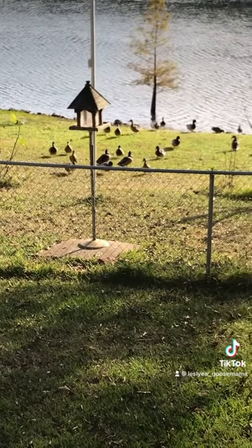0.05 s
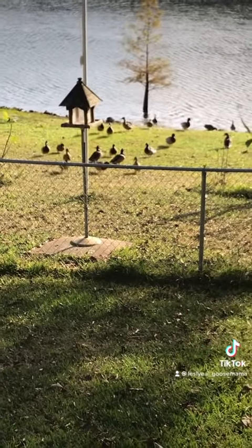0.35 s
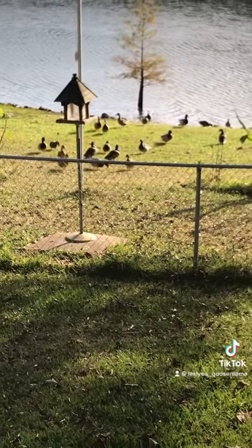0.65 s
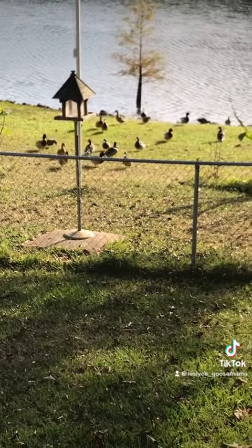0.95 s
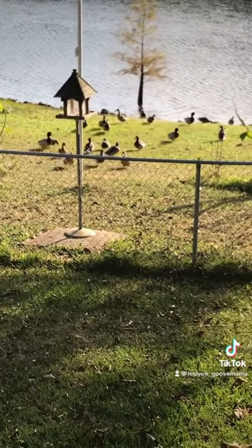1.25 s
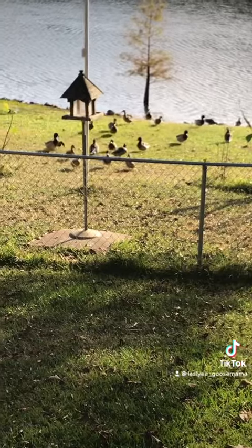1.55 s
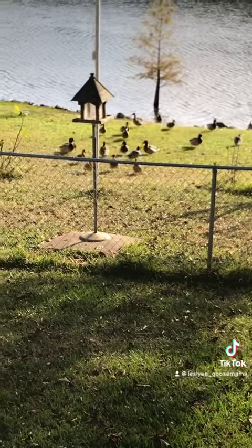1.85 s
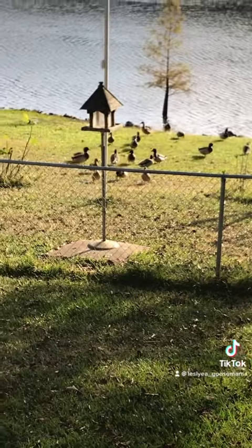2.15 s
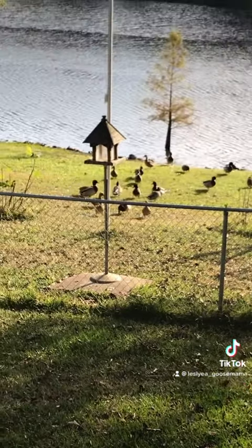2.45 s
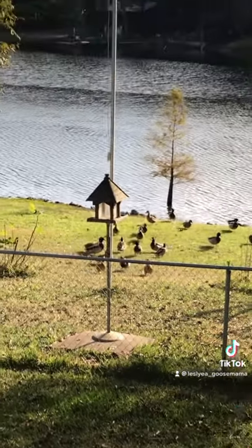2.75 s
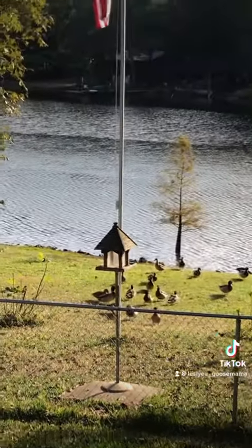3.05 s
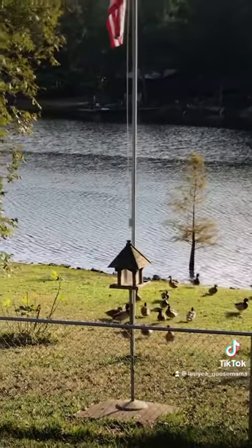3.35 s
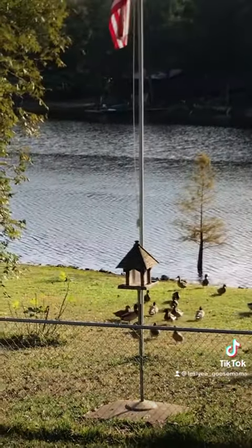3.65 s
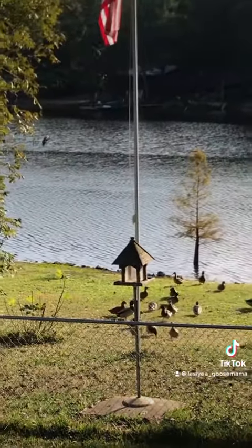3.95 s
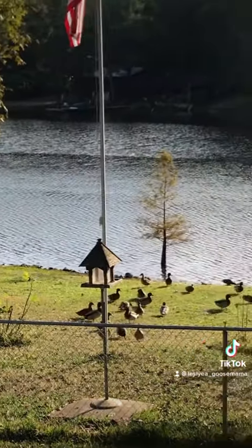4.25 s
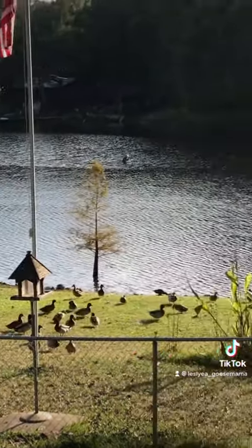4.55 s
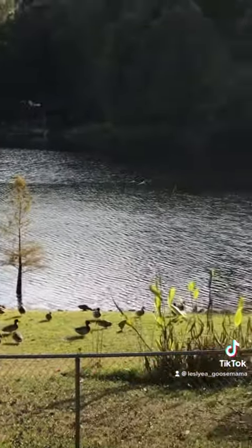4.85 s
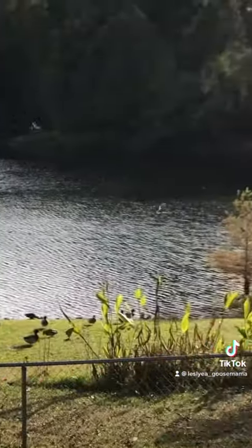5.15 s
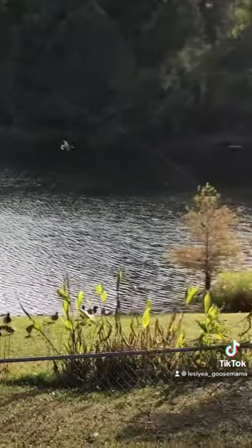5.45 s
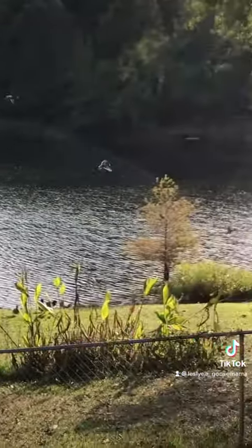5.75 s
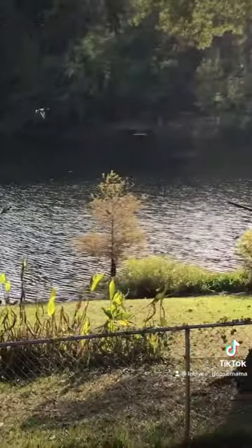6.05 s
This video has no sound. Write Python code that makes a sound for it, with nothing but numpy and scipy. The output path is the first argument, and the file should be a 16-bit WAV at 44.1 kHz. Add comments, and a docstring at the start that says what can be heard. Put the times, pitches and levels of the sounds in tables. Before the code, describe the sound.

A duck gives a run of loud quacks that gradually weaken, while other ducks cluck softly over a low outdoor rumble.

```python
"""A hen mallard on a lakeside lawn, across a yard from the microphone, gives eleven falling quacks.
Her syrinx gives a main and a weaker clap each cycle; her throat rings higher as the bill opens. The flock
clucks around her; far off are four hoots, small birds chipping and dull knocks. The yard throws it all
back over a low outdoor rumble, and a soft rush rises near the end. One dull microphone, in mono, with
a faint hiss, a brush of wind at the start and two late, low bumps."""
import sys
import numpy as np
from scipy import signal
from scipy.fft import rfft, irfft
from scipy.io import wavfile
from scipy.ndimage import uniform_filter1d

SR = 44100
rng = np.random.default_rng(int(sys.argv[2]) if len(sys.argv) > 2 else 0)


def output_pcm(signal):
    """Save a mono or channel-first signal as 16-bit PCM at the path in sys.argv[1].

    Samples are clipped to [-1, 1] before scaling.
    """
    pcm = np.clip(np.atleast_2d(signal).T, -1, 1) * 32767
    wavfile.write(sys.argv[1], SR, np.round(pcm).astype(np.int16))


N = 269451
TIME = np.arange(N) / SR

# outdoor air at the microphone: (frequency [Hz], relative density [dB])
AIR_SPECTRUM = [(15, -10), (28, -11.5), (60, 3.5), (90, 0), (170, -9), (315, -13), (586, -16.5),
                (1000, -19), (1800, -15), (3200, -21.5), (6000, -24.5), (10000, -16.5), (16000, -25.5)]
# its rumble and rustle: (time [s], level [dB])
AIR_LEVELS = [(0, -56.5), (.6, -57.5), (1.3, -54.5), (2.3, -56), (3.7, -56), (6.1, -56)]
# short clucks of the flock, and the hen's croaks at the edges of her first two quacks: (middle [s],
# length [s], level [dB], throat resonance [Hz], clap rate [1/s], snap of the outer resonances [dB])
CLUCKS_AND_CROAKS = [(0.08, 0.048, -67.5, 2750, 123, 8), (0.175, 0.079, -67, 1850, 125, 3),
                     (0.267, .04, -62, 2130, 130, -1), (0.492, 0.072, -64.5, 2170, 128, 4),
                     (0.628, 0.054, -64.5, 2290, 115, 2), (0.774, 0.054, -60.5, 2120, 115, -4),
                     (0.873, 0.029, -62.5, 1800, 196, 4), (0.949, .08, -60, 2600, 130, 0),
                     (1.01, .08, -55, 1800, 175, 0), (1.052, .03, -47, 2000, 205, 5),
                     (1.376, 0.067, -61.5, 2550, 120, -3), (1.645, .04, -57, 2100, 210, 1),
                     (2.459, 0.055, -59, 2110, 165, 6), (2.834, 0.04, -56, 2300, 200, 1),
                     (3.112, 0.074, -59, 2330, 220, -1), (3.623, 0.034, -47.5, 2210, 297, -0.5),
                     (3.889, 0.042, -61.5, 2730, 170, -5), (3.97, 0.024, -45.5, 2230, 300, -6),
                     (4.206, .05, -58.5, 2220, 154, 3), (4.353, .026, -46, 2430, 270, -0.5),
                     (4.827, .03, -45.5, 2290, 220, -2.5), (4.936, 0.055, -61.5, 2240, 145, 6),
                     (5.119, 0.012, -52, 2120, 236, 4), (5.259, 0.028, -46, 2215, 276, 2.5),
                     (5.377, .05, -63.5, 2320, 194, 6), (5.536, 0.019, -52.5, 2220, 320, -3),
                     (5.682, .036, -45, 2240, 260, -1), (5.798, 0.042, -57.5, 2160, 155, 5)]
# a clucking throat: (multiple of its main resonance, width [Hz], gain [dB])
CLUCK_RESONANCES = [(.45, 1050, -19.5), (0.956, 620, 14), (1.094, 560, 8), (1.6, 1050, -54.5),
                    (2.15, 1210, -3)]
# reflections off the ground, fence and house: (delay [s], gain [dB])
YARD_ECHOES = [(.0013, -27), (.0093, -7.5), (.021, -8), (0.056, -28.5), (.079, -60), (.118, -30.5)]
# the yard's tail: (frequency [Hz], time to fall 60 dB [s])
YARD_DECAY = [(300, 0.83), (800, 2.5), (2000, 1.06), (4000, 0.85), (8000, 0.43)]
# soft, dull knocks some way off: (start [s], length [s], level [dB], pitch [Hz])
FAR_KNOCKS = [(0.497, 0.076, -68.5, 237), (.85, 0.066, -66, 270), (1.186, 0.056, -62.5, 280),
              (1.537, 0.063, -62.5, 274), (1.738, 0.062, -66.5, 266), (1.949, .08, -68, 274),
              (2.289, 0.07, -65.5, 281), (2.607, 0.07, -64.5, 292)]
# small birds far away: (start [s], length [s], level [dB], pitch [Hz])
FAR_CHIPS = [(0.848, 0.031, -70, 4200), (3.167, 0.024, -68, 4600), (3.475, 0.03, -68, 6300),
             (5.031, 0.089, -67, 2980)]
# something hooting far off: (start [s], length [s], level [dB], pitch [Hz])
FAR_HOOTS = [(2.015, 0.13, -67.5, 673), (2.869, 0.11, -66, 620), (3.778, 0.15, -65.5, 650),
             (4.601, 0.15, -67, 666)]
# the hen across the yard: (start [s], attack [s], hold [s], release [s], crest after the start [s],
# relative level [dB], top pitch [Hz], mid-cycle clap at the crest [0-1], roughness at the crest [0-1],
# treble [dB], bill opening [factor on the throat's frequencies])
HEN_QUACKS = [(1.024, 0.082, 0.044, 0.073, .088, -37, 211.7, 0.82, 0.1, 0.5, 1),
              (1.412, 0.061, 0.061, 0.15, 0.093, -37.5, 211, 0.84, 0.03, 1.5, 1.002),
              (1.819, 0.031, 0.12, 0.06, 0.074, -40.5, 198.4, .8, 0.03, 1.5, 1.032),
              (2.176, 0.029, 0.11, 0.043, 0.076, -40.5, 194, .7, 0.14, 1.5, 1.02),
              (2.535, 0.04, 0.083, 0.05, 0.076, -39.5, 189.9, 0.58, 0.13, -0.5, 1.013),
              (2.897, 0.029, 0.076, 0.085, 0.059, -40, 184.5, 0.6, 0.14, -2.5, 1.026),
              (3.24, 0.041, 0.075, 0.081, 0.064, -42.5, 184, 0.47, 0.17, -6, 1.015),
              (3.591, 0.042, .065, 0.064, .056, -43.5, 184.4, 0.3, 0.22, -2.5, 0.994),
              (3.937, 0.034, 0.078, .065, 0.061, -45.5, 182, 0.52, 0.31, -0.5, 1),
              (4.267, .025, .085, 0.092, 0.068, -47.5, 177.6, 0.44, 0.24, 3, 1.034),
              (4.619, 0.017, 0.08, 0.077, 0.058, -48, 173.9, 0.6, 0.35, -1, 1.023)]
# her throat, bill nearly shut: (frequency [Hz], width [Hz], gain [dB],
# rise as the bill opens [share], added gain as it opens [dB])
HEN_RESONANCES = [(277, 66, -24, 0.1, 17), (980, 260, -9.5, 0.12, 0), (1328, 184, -5, 0.17, -8),
                  (1752, 446, 4, 0.21, 2.5), (2004, 586, -2, 0.2, 9), (2623, 210, -10.5, 0.29, 9.5),
                  (4610, 550, -15, 0.0082, 2.5), (5390, 1450, -19, 0.013, 12),
                  (7080, 4270, -17.5, 0.096, 12.5)]
# the late rush: (frequency [Hz], relative density [dB])
RUSH_SPECTRUM = [(100, -30), (250, -8.5), (420, -9.5), (600, -2.5), (950, -2), (1200, -8), (1500, -3),
                 (1700, -23), (4000, -41)]
# bumps right on the microphone: (start [s], length [s], level [dB], pitch [Hz])
MIC_BUMPS = [(5.627, 0.06, -57, 67.6), (6.045, .07, -49.5, 47.6)]
# the microphone's dull top end: (frequency [Hz], gain [dB])
MIC_RESPONSE = [(20, 0), (6400, 1), (6650, -9), (7150, -11), (9900, -17), (10400, -18.5), (16000, -5.5)]
# its own hiss: (frequency [Hz], relative density [dB])
MIC_HISS = [(20, -20), (6000, -35), (10000, -17), (12500, -4.5), (15000, -1.5), (16000, -6.5)]

MAX_DROP_HZ = 42  # a quack's pitch arch stays within this of its top
SECOND_AT_ENDS, ROUGH_AT_ENDS = 0.56, 0.64  # mid-cycle clap and roughness as a quack goes slack


def gain_of(db):
    """Decibels to amplitude."""
    return 10 ** (np.asarray(db) / 20)


def unit_rms(x):
    """Scales to an rms of one."""
    return x / np.sqrt(np.mean(x ** 2) + 1e-20)


def value_at(points, hz):
    """Reads a table on a log-frequency axis."""
    f, value = np.transpose(points)
    return np.interp(np.log(hz + 1), np.log(f + 1), value)


def add(mix, start, sound):
    """Mixes a sound in at its start time in seconds."""
    part = mix[max(round(start * SR), 0):][:len(sound)]
    part += sound[:len(part)]


def coloured(x, spectrum):
    """Filters by a spectrum."""
    gain = gain_of(value_at(spectrum, np.fft.rfftfreq(2 * N, 1 / SR)))
    return irfft(rfft(x, 2 * N) * gain)[:N]


def noise(spectrum):
    """Steady coloured noise with an rms of one."""
    return unit_rms(coloured(rng.standard_normal(N), spectrum))


def resonate(x, hz, width):
    """A steep resonance of gain one that follows the curve hz."""
    turn = np.exp(2j * np.pi * np.cumsum(hz * np.ones(len(x))) / SR)
    r = np.exp(-np.pi * width / SR)
    return 2 * (turn * signal.lfilter([(1 - r) ** 2], [1, -2 * r, r * r], x / turn)).real


def pulses(size, places, heights):
    """Sharp pulses at exact, fractional sample places."""
    at = np.floor(places).astype(int)[:, None] + np.arange(-7, 9)
    offset = at - places[:, None]
    shape = np.sinc(offset) * np.cos(np.pi * offset / 16) ** 2
    return np.bincount(np.clip(at, 0, size - 1).ravel(), (heights[:, None] * shape).ravel(), size)


def outdoor_air(hum_hz=120, hum_db=-68, wind_db=-60, wind_fall_db_per_s=4):
    """Rumble and rustle all around, a faint hum, and wind dying down on the microphone."""
    air = gain_of(np.interp(TIME, *np.transpose(AIR_LEVELS))) * noise(AIR_SPECTRUM)
    hum = gain_of(hum_db) * unit_rms(resonate(rng.standard_normal(N), hum_hz, width=4.4))
    wind = unit_rms(resonate(rng.standard_normal(N), hz=53.5, width=51))
    return air + hum + gain_of(wind_db - wind_fall_db_per_s * TIME) * wind


def cluck(length, level_db, throat_hz, rate, snap_db, slowing=0.67, uneven=0.1056, shimmer_db=1.8):
    """A duck's cluck or croak: uneven claps swell, slow down and fade in a half-shut throat."""
    progress = np.linspace(0, 1, int(length * SR))
    size = len(progress)
    cycles = np.cumsum(rate * (1 + slowing * (.5 - progress))) / SR
    count = np.arange(int(cycles[-1]) + 1)
    late, strong = rng.standard_normal((len(count), 2)).T
    unsteady = uneven * min(1, (.03 / length) ** 2)  # longer clucks settle into a pitch
    places = np.interp(count + .5 + unsteady * late, cycles, np.arange(size))
    claps = pulses(size, places, gain_of(shimmer_db * strong))
    breath = .15 * rng.standard_normal(size)
    drive = (unit_rms(claps) + breath) * np.sin(np.pi * progress)
    drive = np.pad(drive, (0, SR // 200))  # room to ring out
    voice = np.zeros(len(drive))
    for multiple, width, db in CLUCK_RESONANCES:
        outer = abs(multiple - 1) > .3
        voice += gain_of(db + outer * snap_db) * resonate(drive, throat_hz * multiple, width)
    return gain_of(level_db) * unit_rms(voice)


def yard(x, echo_db, tail_db, taps_per_s=2500, build_s=0.0085):
    """The direct sound, a few near reflections, and a tail scattered by trees and the far shore."""
    echoes = np.zeros(SR)
    for delay, db in YARD_ECHOES:
        add(echoes, delay, gain_of([db + echo_db]))
    taps = rng.standard_normal(SR) * (rng.random(SR) < taps_per_s / SR)
    hz, t, bands = signal.stft(taps, SR, nperseg=256)
    bands *= gain_of(-60 * t / value_at(YARD_DECAY, hz)[:, None]) * (1 - np.exp(-t / build_s))
    tail = signal.istft(bands, SR, nperseg=256)[1][:SR]
    return x + signal.fftconvolve(x, echoes + gain_of(tail_db) * tail / np.linalg.norm(tail))[:N]


def far_sound(length, level_db, hz, blur=0.2):
    """A knock, chip or hoot, blurred by distance to one soft band."""
    size = int(length * SR)
    band = resonate(rng.standard_normal(size), hz, width=hz * blur)
    return gain_of(level_db) * unit_rms(band * signal.windows.hann(size))


def air_push(attack, hold, release, crest, onset_db=-14, release_db=-19,
             climb_hz_per_s=600, sag_hz_per_s=385, round_s=.025):
    """One push of air: the level swells, holds and dies; the pitch climbs, rounds over and sags."""
    t = np.arange(0, attack + hold + release, 1 / SR)
    attack_left = np.clip(1 - t / attack, 0, 1)
    released = np.clip((t - attack - hold) / release, 0, 1)
    swell_db = onset_db * attack_left ** 0.91 + release_db * released
    slope = np.where(t < crest, climb_hz_per_s, sag_hz_per_s)
    slide_hz = slope * (np.hypot(t - crest, round_s) - round_s)
    return t, swell_db, MAX_DROP_HZ * np.tanh(slide_hz / MAX_DROP_HZ)


def syrinx(t, hz, arch, top_second, top_rough,
           flutter=0.0026, jitter_s=0.0002, shimmer_db=3, croak_s=.00008, croak_db=2.0):
    """A main clap and a weaker mid-cycle clap, strongest at the crest of the first, loudest quacks."""
    second = np.clip(SECOND_AT_ENDS + (top_second - SECOND_AT_ENDS) * arch, 0, 1)
    # at the low start and end of a quack the claps turn uneven and croaky
    slack = np.clip((186 - hz) / 25, 0, 1)
    rough = np.clip(top_rough + (ROUGH_AT_ENDS - top_rough) * (1 - arch ** 2), 0, 1)
    wobble = unit_rms(sum(np.sin(2 * np.pi * (f * t + rng.random())) for f in np.geomspace(15, 70, 8)))
    cycles = np.cumsum(hz * (1 + flutter * rough * wobble)) / SR
    half_cycles = np.arange(1, int(2 * cycles[-1]))
    places = np.interp(half_cycles / 2, cycles, np.arange(len(t)))
    at = places.astype(int)
    late, strong = rng.standard_normal((len(at), 2)).T
    late_s = (jitter_s * rough[at] + croak_s * slack[at]) * late
    strong_db = (shimmer_db * rough[at] + croak_db * slack[at]) * strong
    heights = np.where(half_cycles % 2, second[at], 1) * gain_of(strong_db)
    claps = pulses(len(t), places + SR * late_s, heights)
    # air rushes through after each main clap
    puffs = (.2 + np.exp(-(cycles % 1) / .3)) * rng.standard_normal(len(t))
    return unit_rms(claps) + rough * unit_rms(puffs)


def quack(attack, hold, release, crest, held_db, top_hz, second, rough, treble_db, bill, lag_s=0.011):
    """The hen's claps ring her throat; her bill opens just behind the pitch and lifts the resonances."""
    t, swell_db, drop_hz = air_push(attack, hold, release, crest)
    hz = top_hz - drop_hz
    arch = 1 - drop_hz / MAX_DROP_HZ  # one at the crest, lower towards the ends
    drive = syrinx(t, hz, arch, second, rough)
    opening = np.clip((np.interp(t - lag_s, t, hz) - 176) / 26, 0, 1)
    voice = np.zeros(len(t))
    for mode_hz, width, db, rise, open_db in HEN_RESONANCES:
        upper = mode_hz > 2500
        ring = resonate(drive, mode_hz * bill * (1 + rise * opening), width)
        voice += gain_of(db + open_db * opening + upper * treble_db) * ring
    power = uniform_filter1d(voice ** 2, size=1100)
    steady = voice / np.sqrt(abs(power) + 1e-12)  # so the push of air sets the level
    return gain_of(held_db + swell_db) * steady * signal.windows.tukey(len(t), .04)


def rush(start_s=5.57, rise_s=0.077, level_db=-57, fade_db_per_s=10.5):
    """A soft mid-range rush that rises quickly and fades slowly."""
    t = np.maximum(TIME - start_s, 0)
    return np.minimum(t / rise_s, 1) * gain_of(level_db - fade_db_per_s * t) * noise(RUSH_SPECTRUM)


def mic_bump(length, level_db, hz):
    """A soft bump on the microphone: a few low swings."""
    t = np.arange(0, length, 1 / SR)
    swings = np.sin(2 * np.pi * (hz * t + rng.random()))
    return gain_of(level_db) * unit_rms(swings * signal.windows.hann(len(t)))


def scene():
    """The lawn from the microphone's place; the far sounds carry the most of the yard's echo."""
    clucks, far, quacks, bumps = np.zeros((4, N))
    for middle, length, *settings in CLUCKS_AND_CROAKS:
        add(clucks, middle - length / 2, cluck(length, *settings))
    for start, *settings in FAR_KNOCKS + FAR_CHIPS + FAR_HOOTS:
        add(far, start, far_sound(*settings))
    for start, *settings in HEN_QUACKS:
        add(quacks, start, quack(*settings))
    for start, *settings in MIC_BUMPS:
        add(bumps, start, mic_bump(*settings))
    mix = outdoor_air() + yard(clucks, echo_db=-1, tail_db=-14)
    mix += yard(far, echo_db=2.5, tail_db=-2)
    mix += gain_of(-0.35) * yard(quacks, echo_db=-2.5, tail_db=-11)
    return np.tile(mix + rush() + bumps, (2, 1))


def record(dry, hiss_db=-70, edge_hz=15800):
    """One dull microphone with its own hiss, band-limited and fed to both channels."""
    mono = coloured(dry.mean(0), MIC_RESPONSE) + gain_of(hiss_db) * noise(MIC_HISS)
    lowpass = signal.firwin(1023, edge_hz, window=("kaiser", 9), fs=SR)
    return np.tile(signal.oaconvolve(mono, lowpass, "same"), (2, 1))


dry = scene()
out = record(dry)
output_pcm(out)
```